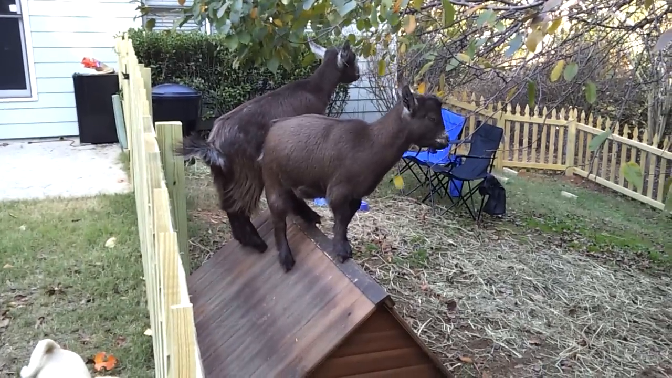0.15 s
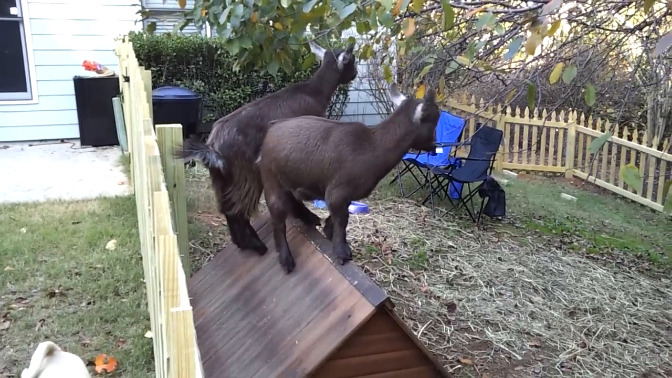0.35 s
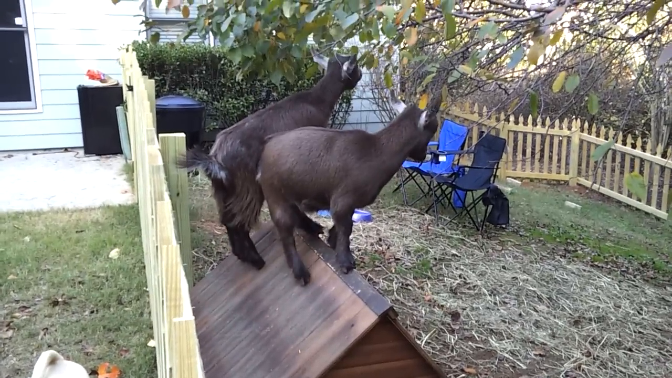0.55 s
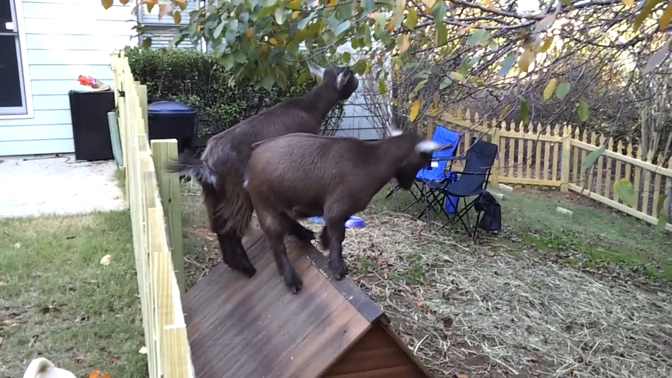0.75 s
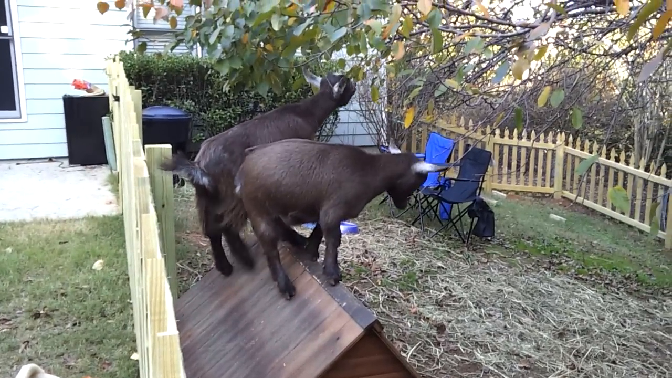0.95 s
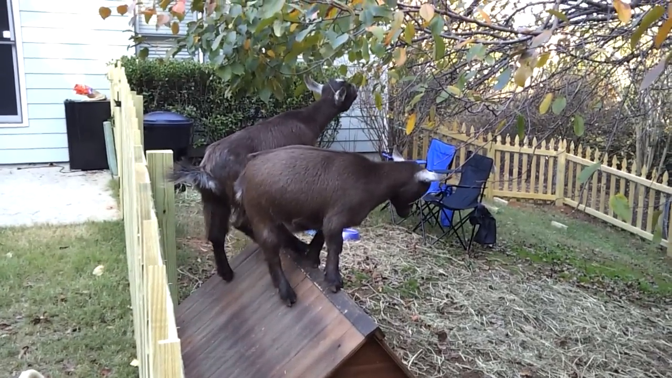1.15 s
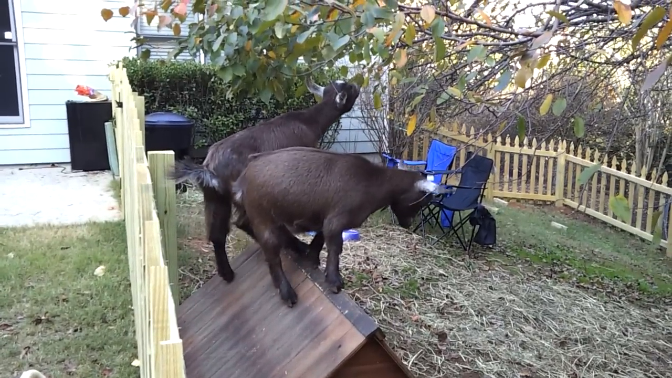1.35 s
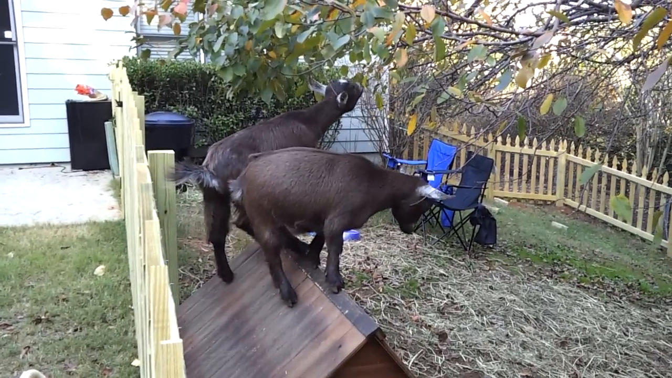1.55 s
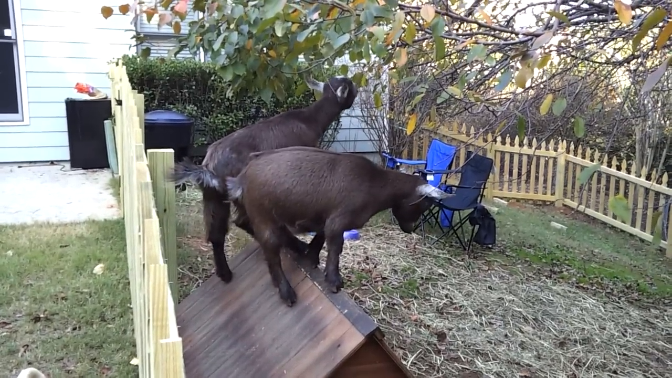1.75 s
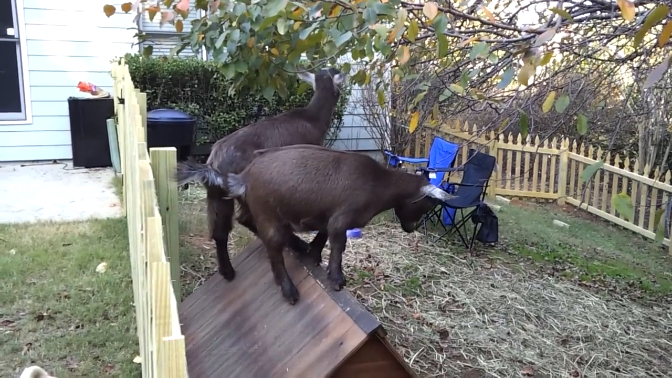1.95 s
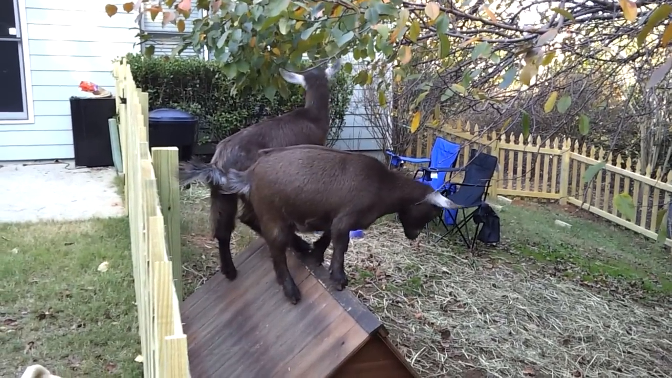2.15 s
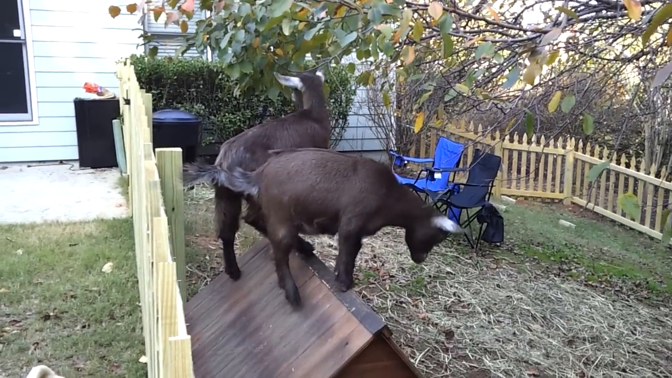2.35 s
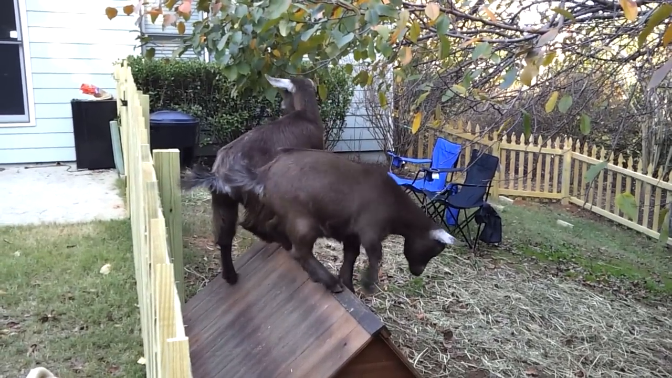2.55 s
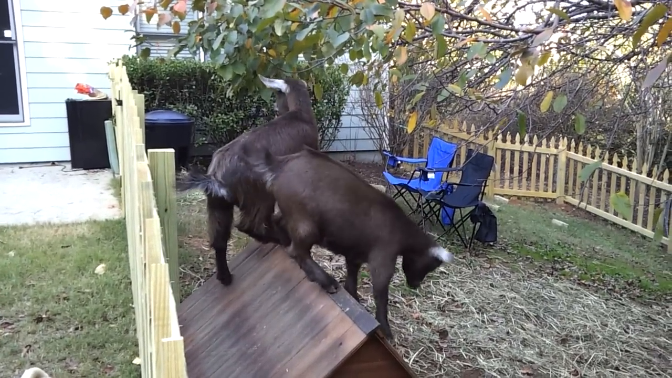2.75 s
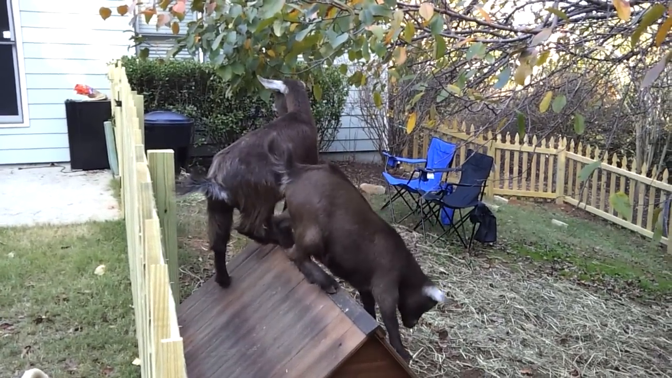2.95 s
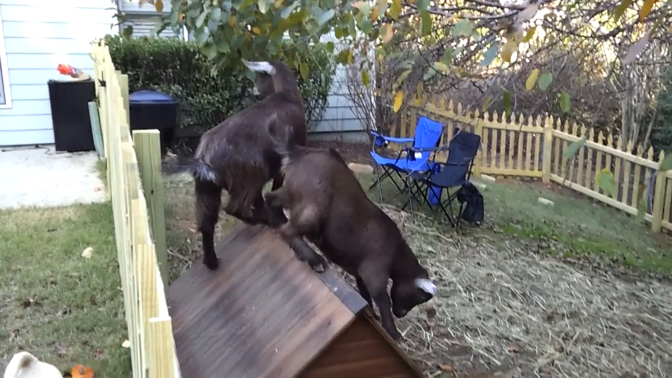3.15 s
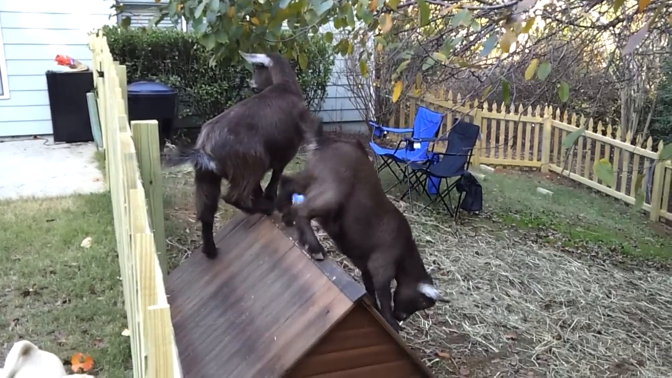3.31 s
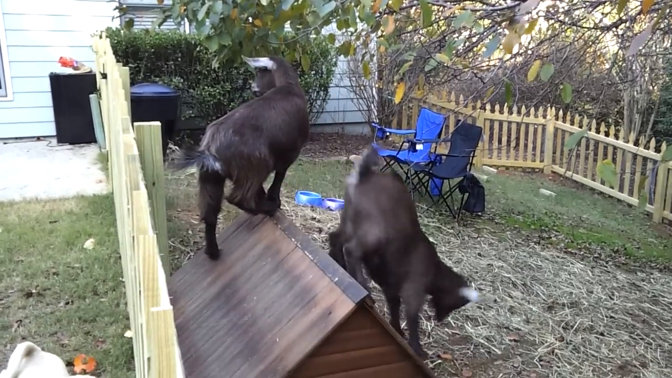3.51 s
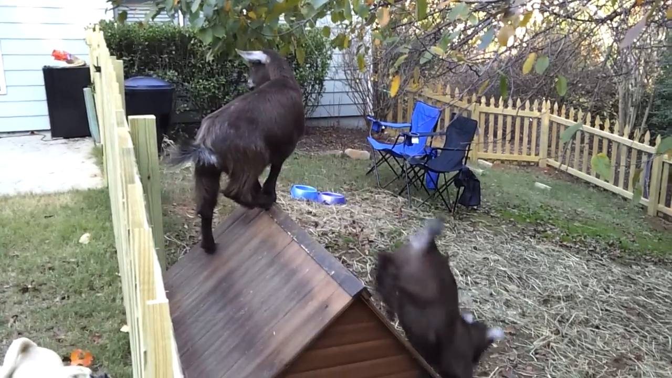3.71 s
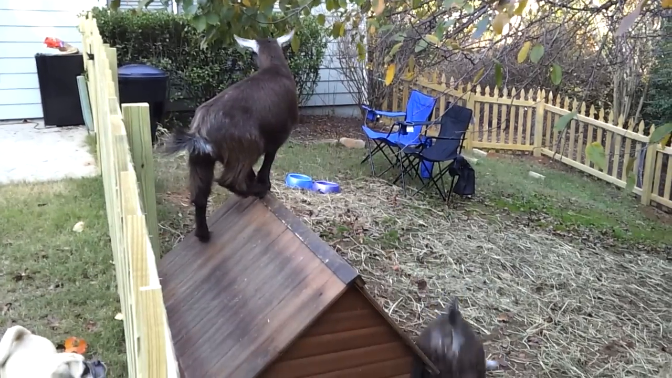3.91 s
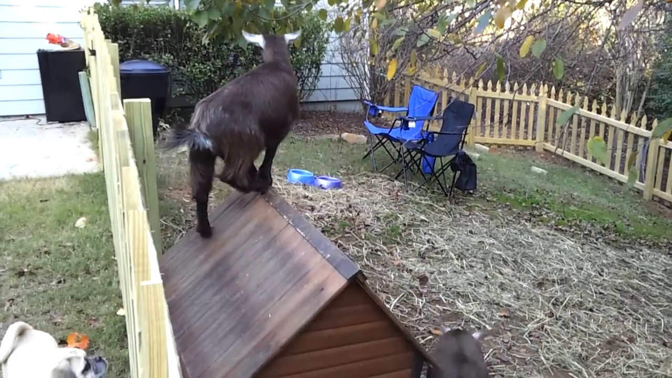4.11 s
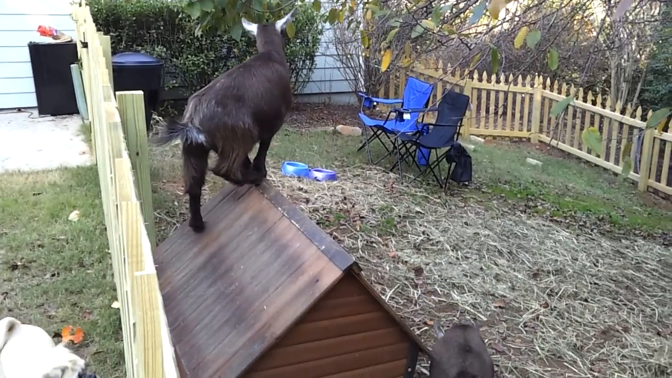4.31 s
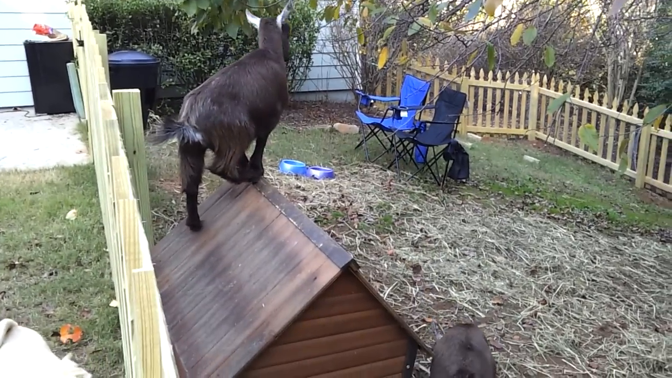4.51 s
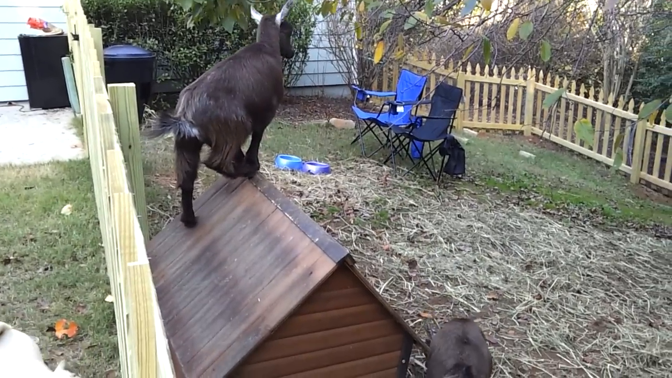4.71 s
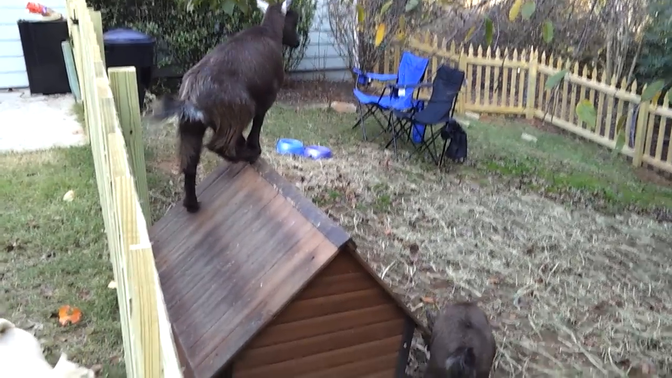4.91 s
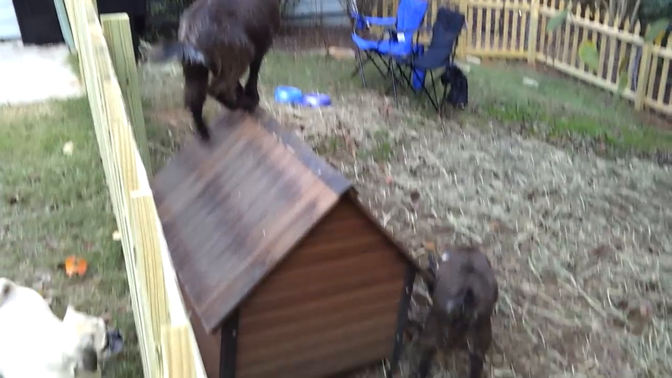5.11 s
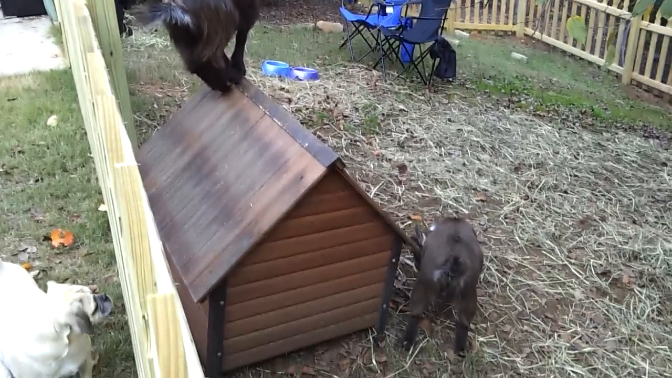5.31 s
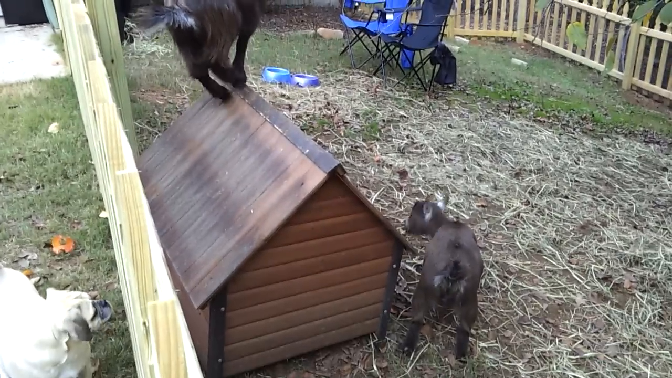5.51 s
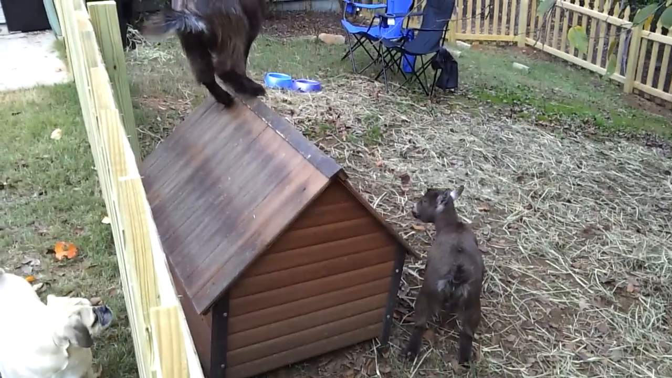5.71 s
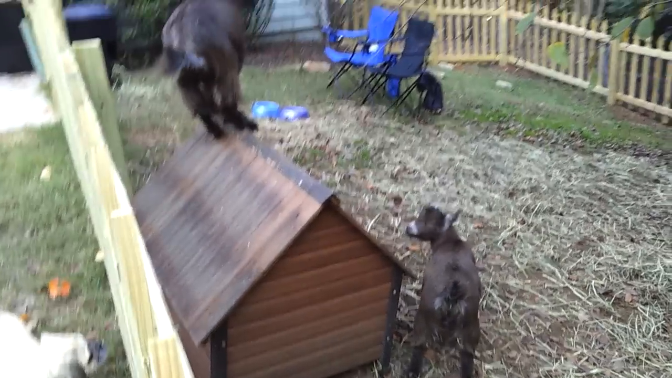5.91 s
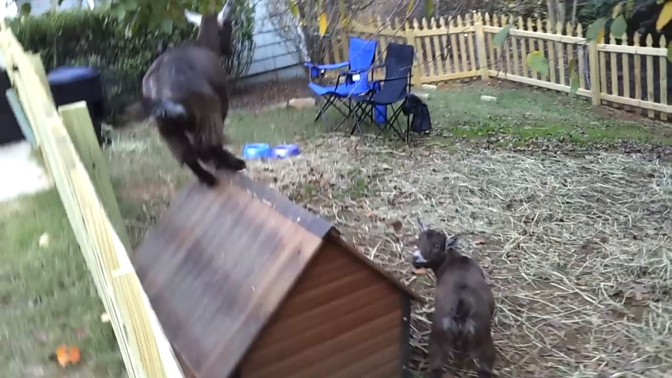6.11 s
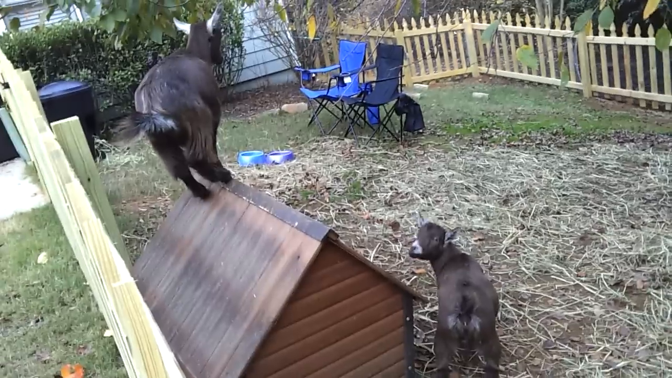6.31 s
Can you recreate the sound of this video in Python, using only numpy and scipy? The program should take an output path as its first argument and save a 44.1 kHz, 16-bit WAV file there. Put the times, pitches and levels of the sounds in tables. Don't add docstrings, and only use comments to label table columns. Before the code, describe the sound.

Close hoof knocks ring hollow boards, with gritty scuffs between them. One sharp, heavy knock leads into a rough slide with low groans and tiny squeaks, a rapid clatter of hooves pushing off, then the loudest boomy landing thuds. Dry snaps and straw rustles trail off into a few light taps. Overlapping cricket trills, distant engine drone and airy outdoor hush sit behind, with short yard echoes on a phone microphone.

```python
import sys
import numpy as np
from scipy import signal
from scipy.io import wavfile
from scipy.ndimage import uniform_filter1d

SR = 44100
rng = np.random.default_rng(int(sys.argv[2]) if len(sys.argv) > 2 else 0)


def to_wav(s):
    ch = np.atleast_2d(s).T
    pcm = np.round(np.clip(ch, -1, 1) * 32767)
    wavfile.write(sys.argv[1], SR, pcm.astype(np.int16))


def magnitude_from_level(level_db):
    exponent = np.asarray(level_db, float) / 20
    return 10 ** exponent


N = 284886
TIME = np.arange(N) / SR

# t/s, boards level/dB, hollow box level/dB, hoof tick level/dB, board f/Hz
TAPS = [(0.454, -43, -32, -40, 409), (0.502, -45, -39, -60, 337), (0.571, -50, -33, -43, 317),
        (0.825, -31, -34, -40, 438), (1.084, -39, -49, -43, 470), (1.13, -34.5, -36, -29, 296),
        (1.329, -47, -37, -51, 325), (2.194, -41, -52, -43.5, 473), (2.541, -36, -33, -38, 474),
        (2.562, -30.5, -48, -45, 506), (3.898, -50, -24, -61, 290), (4.874, -46, -63, -50, 255),
        (5.332, -34, -33, -32, 439), (5.636, -29, -59, -37, 485), (5.787, -38.5, -40, -37, 558),
        (6.179, -44, -57, -52, 473)]
# t/s, boards level/dB, box level/dB, tick level/dB, thump f/Hz
THUMPS = [(0.279, -36.5, -48, -36.5, 169), (0.542, -56, -34, -51, 137), (1.189, -41, -38, -61, 83),
          (2.308, -37, -22.5, -41.5, 110), (2.341, -62, -33, -57, 87), (2.377, -23.5, -23.5, -35, 174),
          (2.395, -27, -24, -39, 145.4), (2.43, -57, -25.5, -57, 120.7), (2.686, -43, -28.5, -58, 134),
          (2.73, -13.5, -14.5, -26, 185.6), (2.769, -24.5, -44, -36, 195), (2.843, -45, -29.5, -53, 198.4),
          (2.883, -54, -28.5, -55, 107), (2.948, -41, -44, -54, 118.2), (3.659, -49, -33, -50, 103),
          (5.657, -40.5, -36, -56, 175.6)]
# t/s, boards level/dB, box level/dB, tick level/dB, board f/Hz
PUSH_OFF = [
    (3.526, -20, -12, -27, 223),
    (3.544, -14, -13.5, -21.5, 360),
    (3.557, -29, -36, -41, 517),
    (3.569, -29, -31, -35, 340),
    (3.579, -37, -35, -43, 368),
    (3.593, -28, -21, -36, 310),
]
# t/s, boards level/dB, box level/dB, tick level/dB, board f/Hz
LANDING = [
    (3.771, -29.5, -44, -40, 404),
    (3.782, -23, -13, -30, 253),
    (3.789, -25, -7, -28, 235),
    (3.8, -19, -9, -34, 424),
    (3.807, -17, -7, -20.5, 248),
    (3.821, -23.5, -23.5, -29.5, 334),
    (3.839, -34, -28, -36, 302),
]
TAP_THUMP_HZ, PUSH_THUMP_HZ, LANDING_THUMP_HZ = 86, 110, 135.7
BOARD_OVER_THUMP, LOWEST_BOARD_HZ = 1.635, 229

# f/Hz, level/dB, t60/s
BOX_MODES = [(66, -2, 0.22), (105, 0.5, 0.12), (135, -1.5, 0.24), (164.6, -10, 0.41), (196.8, -8, 0.19)]
# f/Hz, level/dB, t60/s
BOARD_MODES = [(224, -2, 0.084), (250, -4.5, 0.16), (293, 3, 0.095), (346, 0, 0.13), (430.6, -3, 0.15),
               (479.7, -9, 0.21), (536, -2, 0.077), (620, -45, 0.03), (900, -14, 0.014)]
# f/Hz, level/dB, t60/s
HORN_MODES = [(820, -6, 0.033), (980, -3.5, 0.078), (1120, -6, 0.05), (1278, 0.5, 0.044), (1452, -1, 0.034),
              (1670, -4.5, 0.053), (1900, -28, .022), (2520, -6, 0.019), (2583, -4, 0.025),
              (2920, -6, 0.037)]

# t/s, drag level/dB
DRAG = [(0.0, -63), (0.43, -50), (0.9, -54.5), (1.55, -56.5), (1.99, -61.5), (2.47, -50.5), (2.7, -49),
        (2.95, -41), (3.2, -45), (3.45, -38.5), (3.72, -41.5), (4.0, -47.5), (4.64, -62), (4.93, -53.5),
        (5.5, -62), (5.99, -57), (6.17, -47), (6.46, -59)]
SHUDDER_DB, SHUDDER_S = -20.5, 0.029
GRIT_AT_REST_DB, GRIT_PER_DRAG, REST_DB = -59, 0.88, -56.5

# t/s, length/s, slip rate f/Hz, level/dB
SQUEAKS = [
    (3.41, 0.04, 457, -48),
    (3.59, 0.064, 459, -47),
    (3.678, 0.042, 461.5, -49.5),
]
# multiple of the slip rate, level/dB
SQUEAK_ORDERS = [(1, 0), (2, -3), (3, 2), (4, -9), (6, -9), (10, -12), (12, -17), (14.5, -6), (16, -11),
                 (17.3, -6), (20, -16), (22.3, -7), (24, -15)]
SQUEAK_ATTACK_S, SQUEAK_FADE_DB_PER_S, SQUEAK_RISE_HZ_PER_S = 0.0055, 280, 136

# t/s, length/s, level/dB, centre f/Hz
CHAFES = [(.171, 0.065, -57, 1740), (0.545, 0.06, -59.5, 6700), (2.83, 0.23, -54, 2460),
          (3.021, 0.011, -50, 11300), (3.195, 0.051, -55, 6600), (3.165, 0.013, -57, 9500),
          (3.547, 0.013, -34, 2300), (3.549, 0.02, -35, 1510), (3.575, 0.063, -45, 2530),
          (3.578, 0.058, -48, 1610), (3.48, 0.091, -62, 1350), (3.47, 0.063, -63, 2440),
          (3.356, 0.014, -43, 3860), (4.3, 0.0086, -48, 10300), (4.032, 0.092, -46, 7600),
          (4.037, 0.11, -46, 9940), (5.79, 0.1, -53.5, 530)]
# t/s, length/s, level/dB, centre f/Hz
SCRAPES = [(0.516, 0.19, -59, 2370), (.521, 0.13, -41.5, 128), (1.811, 0.023, -55, 7407),
           (2.319, 0.0094, -45.5, 2700), (3.3, 0.4, -44.5, 135), (3.3, .45, -53, 381),
           (3.358, 0.0094, -42.5, 4390), (3.363, 0.022, -49, 1980), (4.258, 0.037, -52.5, 8100),
           (4.331, 0.2, -58.5, 1970), (5.011, 0.064, -53, 7600), (5.013, 0.063, -53.5, 2200),
           (5.337, 0.013, -42.5, 2570), (5.901, 0.05, -58, 9800), (6.241, 0.056, -51, 2600)]
# t/s, length/s, level/dB, centre f/Hz
RUSTLES = [(0.785, 0.06, -56.5, 2200), (1.247, 0.053, -56.5, 1766), (1.723, 0.026, -57, 1670),
           (2.557, 0.059, -59, 7040), (2.9, 0.4, -58.5, 7060), (3.251, 0.55, -50.5, 289),
           (3.287, 0.037, -45.5, 1900), (3.412, 0.0091, -46, 2600), (3.506, 0.4, -56.5, 7380),
           (3.55, 0.083, -49, 6120), (3.572, 0.076, -49, 2150), (3.691, 0.052, -49, 6300),
           (3.797, .08, -46.5, 8050), (3.812, 0.098, -44, 1570), (4.035, 0.06, -51, 3450),
           (4.04, 0.09, -45, 6605)]
CHAFE_WIDTH, SCRAPE_WIDTH, RUSTLE_WIDTH = 0.13, 0.37, 0.81

# t/s, peak level/dB, centre f/Hz
SNAPS = [(0.4512, -36.5, 4870), (0.696, -41, 4750), (1.802, -39, 7980), (1.9016, -39, 8670),
         (1.946, -34, 8100), (2.317, -31, 7550), (2.535, -34.5, 6960), (2.633, -38, 6700),
         (2.7675, -35, 7000), (3.3536, -35, 4720), (3.4087, -37, 4450), (3.7297, -37, 5960),
         (3.7735, -34, 7500), (3.783, -27, 8400), (3.7895, -19.5, 5960), (3.818, -33, 5200),
         (3.925, -40, 6970), (3.9707, -42, 7240), (3.9887, -37, 8500), (4.0024, -27, 7700),
         (4.0186, -23.5, 7340), (4.055, -34, 7300), (4.095, -44, 5500), (4.1456, -38, 7340),
         (4.2767, -32.5, 4866), (4.877, -35.5, 4100), (6.085, -42, 5200)]

# start t/s, end t/s, f/Hz, level/dB, wing stroke rate [1/s]
TRILLS = [(-.1, .3765, 3870, -47.5, 33.4), (-.05, .25, 3580, -58, 32), (-.1, .09, 4020, -57, 37),
          (.53, 1.26, 3990, -59.5, 34.35), (.69, 1.364, 3670, -54, 34.3), (.68, 1.2, 3540, -57, 32.1),
          (1.2, 1.75, 3570, -59.5, 32.2), (.81, 1.168, 4090, -54, 37.1), (1.23, 1.804, 3900, -58.5, 33),
          (1.55, 2.0, 3800, -56.5, 34), (1.715, 2.185, 3330, -58.5, 30), (2.15, 2.722, 3715, -58.5, 33.65),
          (2.28, 2.676, 3525, -56.5, 32.05), (2.7, 3.1355, 3860, -47, 33.45), (2.8, 3.6, 3610, -60, 32.5),
          (3.17, 3.89, 3750, -54, 33.05), (3.56, 3.969, 4070, -55, 37.7), (3.85, 4.2, 3840, -61, 34),
          (4.05, 4.523, 3520, -58, 31.55), (4.405, 4.876, 3995, -56.5, 33.7),
          (4.52, 5.35, 3680, -57.5, 33.5), (4.98, 5.593, 3795, -56.5, 34.65),
          (5.45, 6.096, 3620, -56.5, 32.3), (5.545, 6.052, 3335, -58, 30.05),
          (5.58, 6.095, 3770, -55.5, 32.95), (5.69, 6.103, 4080, -55, 37.65),
          (5.95, 6.313, 3900, -59, 32.25), (6.15, 6.5, 3810, -56.5, 34), (6.33, 6.5, 3505, -59, 31.5)]
CHORUS_HZ, CHORUS_WIDTH_HZ, CHORUS_DB = 3694, 410, -59.5
STROKE_SHARE, STROKE_SAG = 0.76, 0.06
WARM_UP_S, WARM_UP_SAG, WARM_UP_HZ_PER_S = 0.07, 0.025, 15

# t/s, firing f/Hz, level/dB
ENGINE = [(0, 74.3, -45.5), (.5, 72.1, -47), (1.2, 72.1, -52), (1.6, 73, -50.5), (2.2, 72.1, -45),
          (2.35, 60.8, -38), (2.602, 54.4, -50), (3.2, 55.75, -45.5), (4.0, 54.16, -41), (4.6, 54.3, -45.5),
          (5.2, 55.03, -41.5), (5.62, 53.76, -39), (5.75, 52.7, -49.5), (6.46, 50.5, -45)]

# f/Hz, level/dB per Hz
AIR = [(12, -41), (20, -15), (58, 4), (85, -22), (120, -15.5), (142, -15.5), (343, -19.5), (460, -20.5),
       (602, -23), (2490, -28), (3820, -29.5), (4370, -30.5), (12100, -32.5), (15700, -70), (22000, -120)]
AIR_DB = -48.5


def band(x, hz, width_hz):
    edges = np.clip([hz - width_hz / 2, hz + width_hz / 2], 10, 0.45 * SR)
    y = signal.sosfilt(signal.butter(2, edges, "band", fs=SR, output="sos"), x)
    return y / y.std()


def walk(rate):
    k = int(SR / rate)
    held = np.repeat(rng.standard_normal(N // k + 1), k)
    return 1.205 * uniform_filter1d(uniform_filter1d(held, k), k)[:N]


def grit(per_s, spread_db, size=N):
    strength = np.minimum(rng.exponential(size=size), 3)
    return (rng.random(size) < per_s / SR) * rng.standard_normal(size) * magnitude_from_level(spread_db * strength)


def add(out, x, s):
    i = max(int(s * SR), 0)
    out[i:i + len(x)] += x[:N - i]


def ring(modes, chance, spot_db, detune):
    hz, db, t60 = np.transpose(modes)[:, :, None]
    t = TIME[:int(SR * t60.max() * 3 / 4)]
    size, sign, pitch = np.transpose(chance[:len(modes)])[:, :, None]
    swell = (1 - np.exp(-t * hz * 6.8)) ** 2
    fade = magnitude_from_level(db + spot_db * size) * np.exp(-np.log(1000) * t / t60) * swell
    fade *= 1 + 1.2 * np.exp(-t * hz / 4.7)
    side = np.where(sign > 0.6, 1, -1)
    y = (side * fade * np.sin(2 * np.pi * hz * (1 + detune * pitch) * t)).sum(axis=0)
    return y / np.abs(y).max()


def blows():
    def at(rows, thump_hz):
        return [(*row[:4], thump_hz, row[4]) for row in rows]

    thumps = [(*row, max(BOARD_OVER_THUMP * row[4], LOWEST_BOARD_HZ)) for row in THUMPS]
    on_roof = at(TAPS, TAP_THUMP_HZ) + at(PUSH_OFF, PUSH_THUMP_HZ) + thumps
    return sorted(on_roof) + at(LANDING, LANDING_THUMP_HZ)


def knocks():
    out, t, hits = np.zeros(N), TIME[:2048], blows()
    chance = rng.standard_normal((len(hits), 3, 10, 3))
    chance[:, :2, 0] = 0
    noise = rng.standard_normal((len(hits), len(t)))
    for (s, boards_db, box_db, tick_db, thump_hz, knock_hz), c, n in zip(hits, chance, noise):
        box = [(thump_hz, 7, 0.18)] + BOX_MODES
        boards = [(knock_hz, 10.5, 0.1)] + BOARD_MODES
        add(out, magnitude_from_level(box_db) * ring(box, c[0], spot_db=3.0, detune=0.0375), s)
        add(out, magnitude_from_level(boards_db) * ring(boards, c[1], spot_db=6.5, detune=0.038), s)
        add(out, magnitude_from_level(tick_db) * ring(HORN_MODES, c[2], spot_db=2.5, detune=0.04), s)
        add(out, magnitude_from_level(tick_db - 16.5) * band(n, hz=2200, width_hz=3000) * np.exp(-t / 0.0093), s)
    return out


def slide():
    drag_db = np.interp(TIME, *np.transpose(DRAG))
    shake = magnitude_from_level(drag_db)
    for s, _, box_db, *_ in PUSH_OFF + LANDING:
        add(shake, magnitude_from_level(box_db + SHUDDER_DB) * np.exp(-TIME[:SR // 2] / SHUDDER_S), s)
    chance = rng.standard_normal((10, 3))
    body = np.pad(ring(BOX_MODES[1:], chance, spot_db=-4.0, detune=0), (0, SR // 2))
    add(body, 0.95 * ring(BOARD_MODES, chance, spot_db=0.5, detune=0), 0)
    rumble = signal.fftconvolve(grit(1600, spread_db=0.5), body)[:N]
    rubbed = grit(2500, spread_db=1.0)
    shingle = 0.3 * band(rubbed, hz=1456, width_hz=690) + 0.32 * band(rubbed, hz=2374, width_hz=580)
    rasp = (shingle + 0.41 * band(rubbed, hz=1900, width_hz=2900)) * magnitude_from_level(4.5 * walk(24.47))
    grit_db = GRIT_AT_REST_DB + GRIT_PER_DRAG * (drag_db - REST_DB)
    return shake * magnitude_from_level(-3.0) * rumble / rumble.std() + magnitude_from_level(grit_db - 5.5) * rasp


def squeak():
    out, wobble, t = np.zeros(N), walk(80), TIME[:SR // 10]
    multiple, order_db = np.transpose(SQUEAK_ORDERS)
    orders = np.arange(1, 25)[:, None]
    for s, length, hz, db in SQUEAKS:
        rate = (hz + SQUEAK_RISE_HZ_PER_S * t) * (1 + 0.003 * wobble[int(s * SR):][:len(t)])
        turn = 2 * np.pi * np.cumsum(rate) / SR
        noise = rng.standard_normal((len(orders), len(t)))
        uneven_db = 32 * uniform_filter1d(noise, size=400, axis=1)
        tones = magnitude_from_level(np.interp(orders, multiple, order_db) + uneven_db) * np.sin(orders * turn)
        corners = [0, SQUEAK_ATTACK_S, length, length + SQUEAK_ATTACK_S]
        shape = np.interp(t, corners, [0, 1, 1, 0]) ** 2
        fade_db = SQUEAK_FADE_DB_PER_S * np.maximum(t - SQUEAK_ATTACK_S, 0)
        add(out, tones.sum(axis=0) * shape * magnitude_from_level(db - fade_db), s)
    return out


def scuffs():
    out, rough = np.zeros(N), magnitude_from_level(3.2 * walk(120))
    size = SR * 3 // 5
    kinds = (CHAFES, CHAFE_WIDTH), (SCRAPES, SCRAPE_WIDTH), (RUSTLES, RUSTLE_WIDTH)
    bursts = sorted((*row, share * row[3]) for rows, share in kinds for row in rows)
    for s, length, db, hz, width_hz in bursts:
        i = int((s - length / 2) * SR)
        bell = np.sin(np.pi * np.clip(TIME[:size] / length, 0, 1)) ** 0.81
        grains = band(grit(4000, spread_db=1.2, size=size), hz, width_hz)[::-1]
        add(out, magnitude_from_level(db) * bell * grains * np.resize(rough[i:], size), i / SR)
    return out


def snaps():
    out, t = np.zeros(N), TIME[:1024]
    for s, db, hz in SNAPS:
        fade = np.exp(-t / 0.00057) + 0.28 * np.exp(-t / 0.011)
        crack = band(rng.standard_normal(len(t)) * fade, hz, width_hz=8100)
        add(out, magnitude_from_level(db) * crack / np.abs(crack).max(), s)
    return out


def crickets():
    out = np.zeros(N)
    flutter = 0.0035 * walk(400) + 0.002 * walk(12)
    rough = magnitude_from_level(2.2 * walk(180) + 1.6 * walk(25))
    for start, end, first_hz, db, rate in TRILLS:
        span = slice(max(int(start * SR), 0), int(end * SR))
        t = TIME[span]
        since = t - start
        own = rng.integers(N - len(t)) + np.arange(len(t))
        closing = np.clip((t - end) * rate % 1 / STROKE_SHARE, 0, 1)
        pulse = np.sin(np.pi * closing) ** 0.8
        warm_up = 1 - WARM_UP_SAG * np.clip(1 - since / WARM_UP_S, 0, 1)
        glide = first_hz * warm_up + WARM_UP_HZ_PER_S * since
        hz = glide * (1 - STROKE_SAG * (closing ** 3 - 0.15) + flutter[own])
        tone = np.sin(2 * np.pi * np.cumsum(hz) / SR)
        swell = np.clip(2 * since / WARM_UP_S, 0, 1)
        uneven = rough[own] ** min(-(db + 49.5) / 16, 1)
        out[span] += magnitude_from_level(db) * uneven * swell * pulse * tone
    t = TIME[:SR // 4]
    scatter = rng.standard_normal(len(t)) * np.exp(-np.log(1000) * t / 0.12)
    wet = signal.fftconvolve(out, scatter / np.linalg.norm(scatter))[:N]
    far = band(rng.standard_normal(N), CHORUS_HZ, CHORUS_WIDTH_HZ) * magnitude_from_level(CHORUS_DB + 2.0 * walk(30))
    return 1.8 * out + wet + far


def engine():
    s, hz, db = np.transpose(ENGINE)
    turn = 2 * np.pi * np.cumsum(np.interp(TIME, s, hz) * (1 + 0.02 * walk(14))) / SR
    level = magnitude_from_level(np.interp(TIME, s, db) - 2.0 + 2 * walk(22.12))
    return level * (np.sin(turn) + 0.17 * np.sin(2 * turn))


def air():
    out, swell = np.zeros(N), walk(1.0)
    hzs, dbs = np.transpose(AIR)
    for hz in 22 * 2 ** np.arange(0, 9.3, 0.5):
        gust_db = (1.1 + 0.17 * (hz < 3000) + 1.7 * (hz < 100)) * walk(4.035) + 0.34 * swell
        db = np.interp(np.log(hz), np.log(hzs), dbs) + 10 * np.log10(hz)
        out += magnitude_from_level(db + gust_db) * band(rng.standard_normal(N), hz, hz * 0.39)
    return magnitude_from_level(AIR_DB) * out / out.std()


def echoes(near):
    t = TIME[:SR // 3]
    yard = rng.standard_normal(len(t)) * np.exp(-np.log(1000) * t / 0.18) * (t > 0.008)
    yard = signal.sosfilt(signal.butter(2, 260, "high", fs=SR, output="sos"), yard)
    return magnitude_from_level(-8.5) * signal.fftconvolve(near, yard / np.linalg.norm(yard))[:N]


def scene():
    near = knocks() + slide() + squeak() + scuffs() + snaps()
    return (near + echoes(near) + crickets() + engine() + air())[None]


def top_cut(x):
    return signal.sosfilt(signal.butter(12, 12260, fs=SR, output="sos"), x)


def record(dry):
    rounded = np.tanh(1.2 * dry) / 1.2
    top_edge = signal.ellip(12, 0.2, 90, 11900, fs=SR, output="sos")
    return top_cut(signal.sosfilt(top_edge, rounded))


dry = scene()
out = record(dry)
to_wav(out)
```